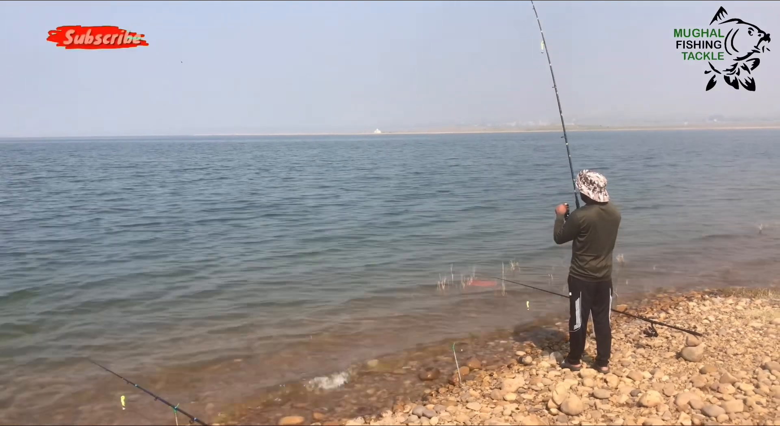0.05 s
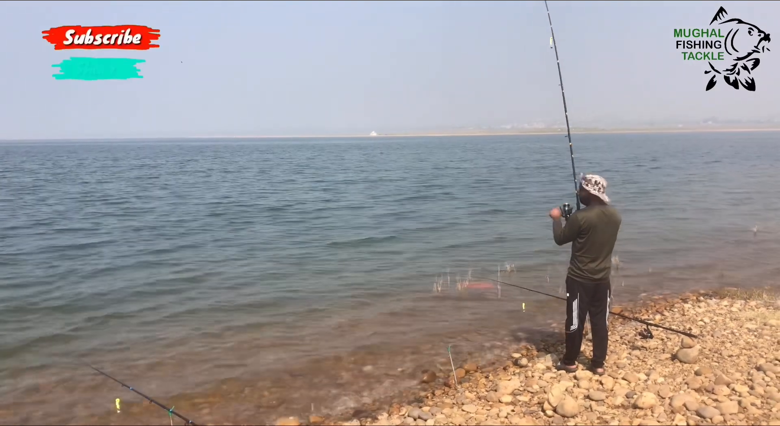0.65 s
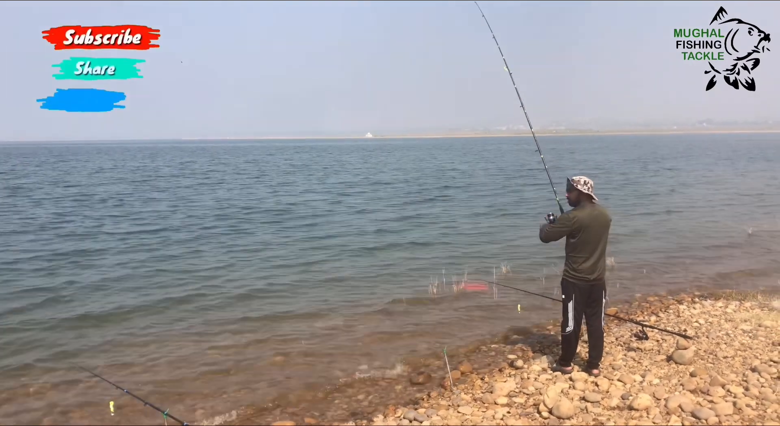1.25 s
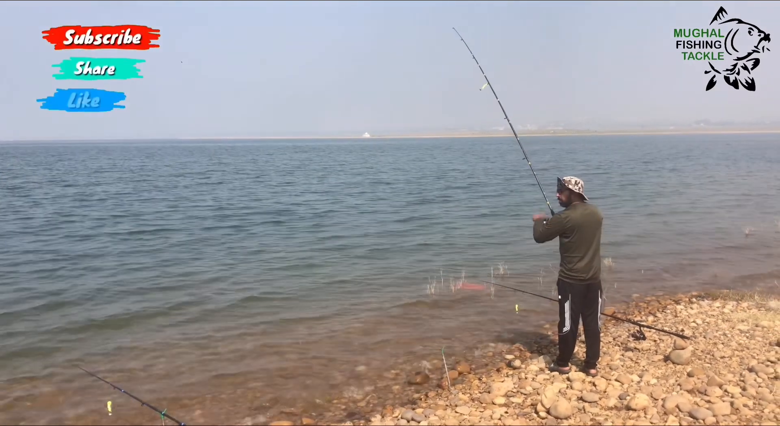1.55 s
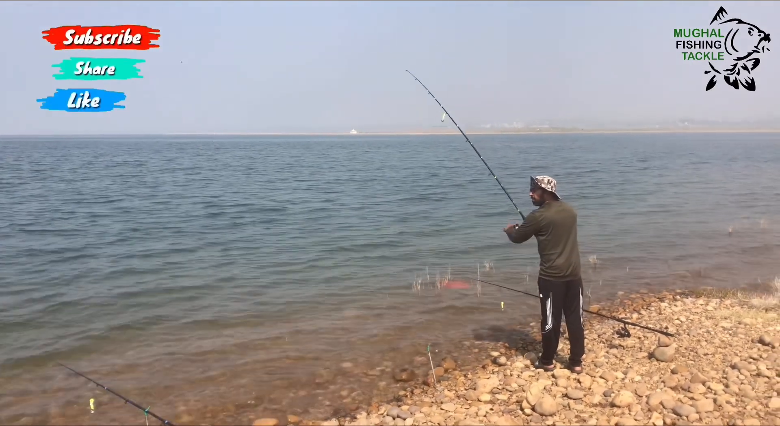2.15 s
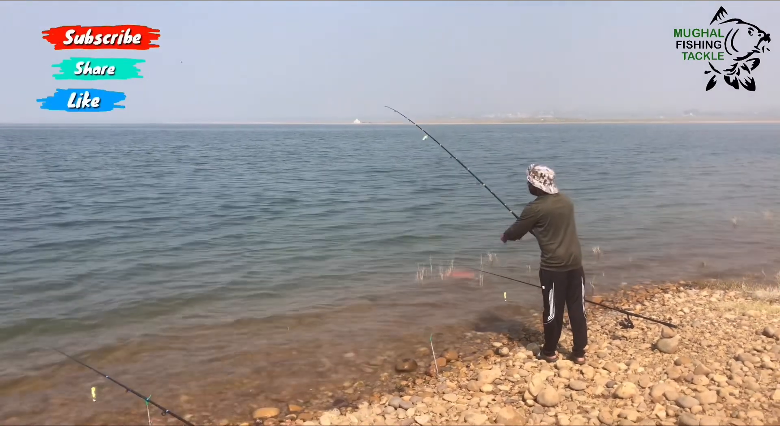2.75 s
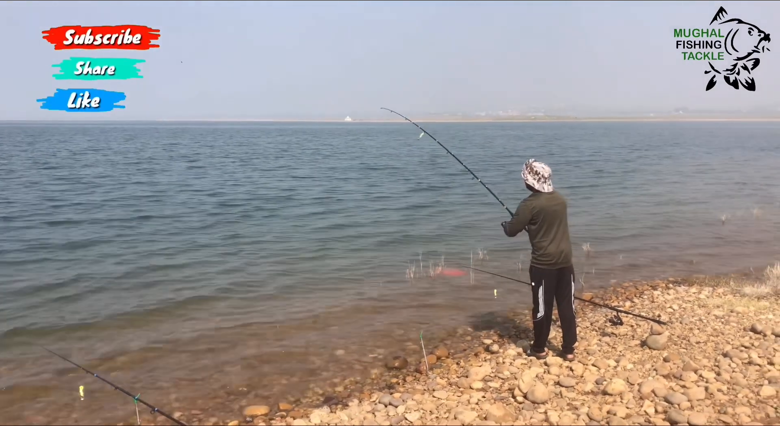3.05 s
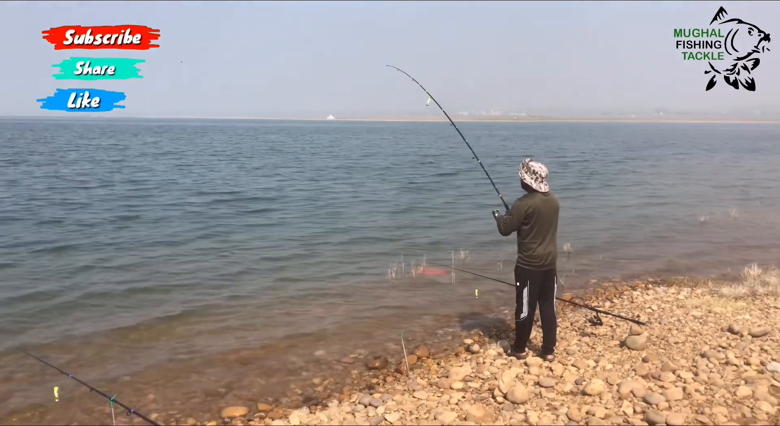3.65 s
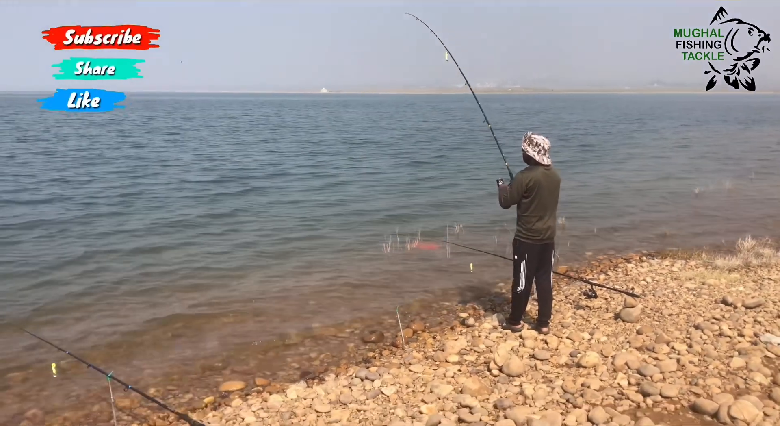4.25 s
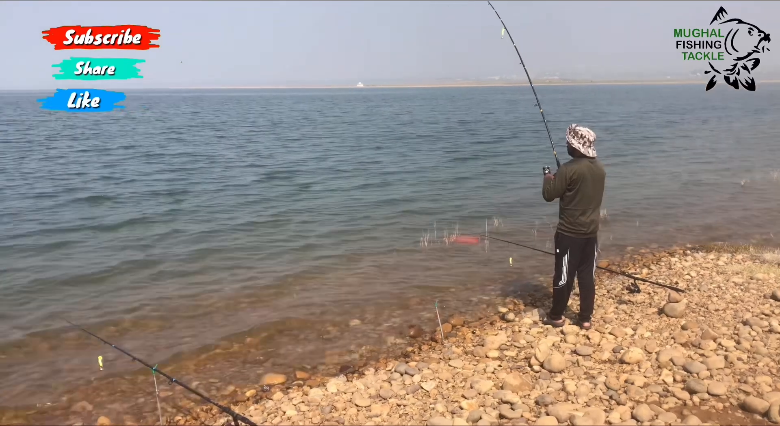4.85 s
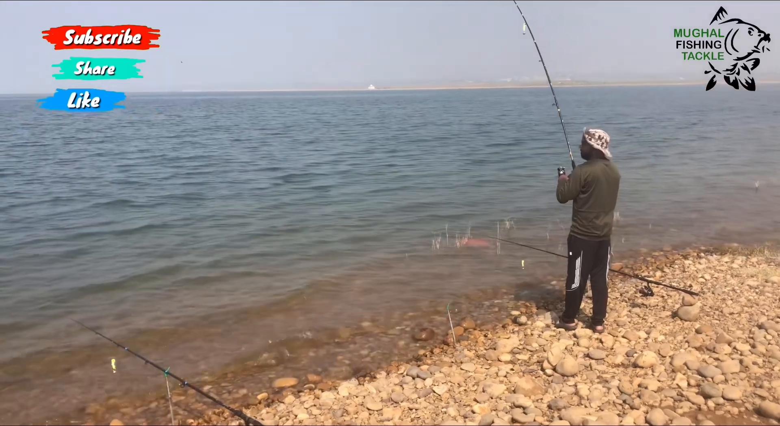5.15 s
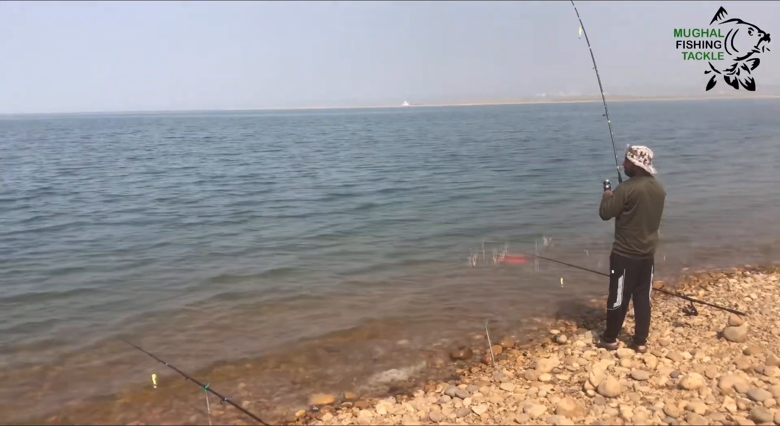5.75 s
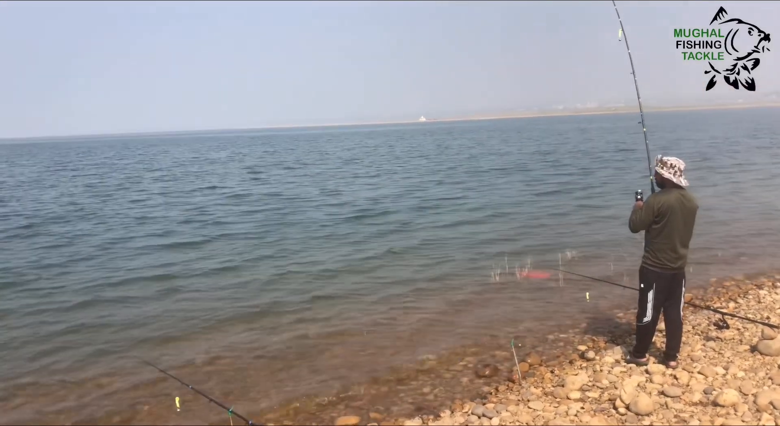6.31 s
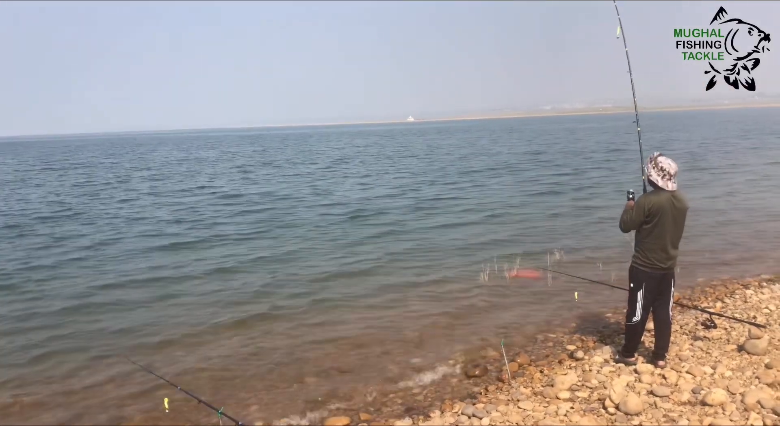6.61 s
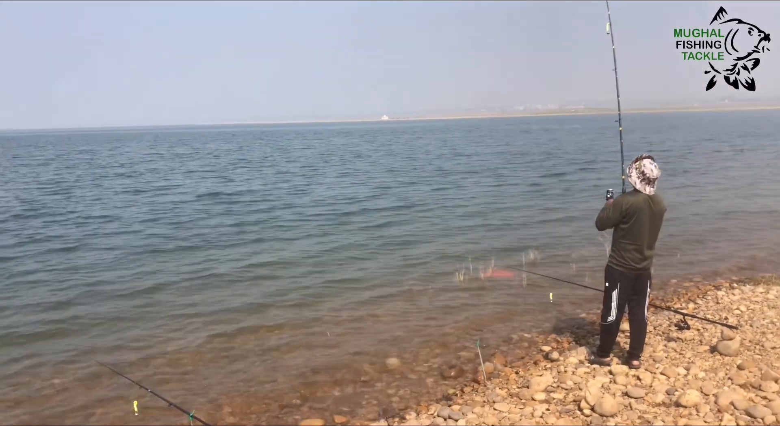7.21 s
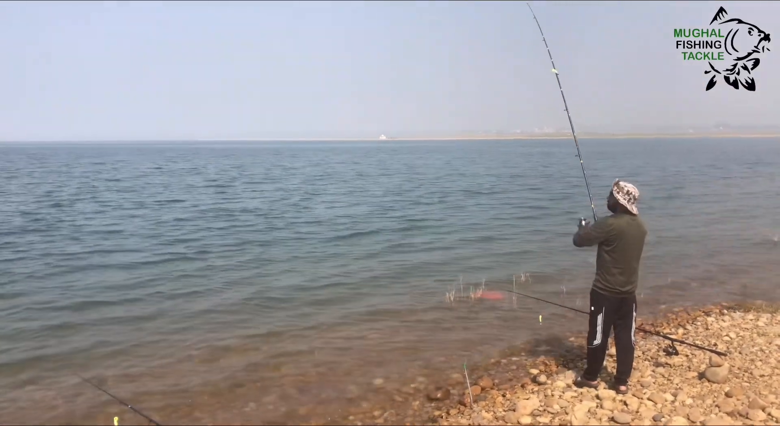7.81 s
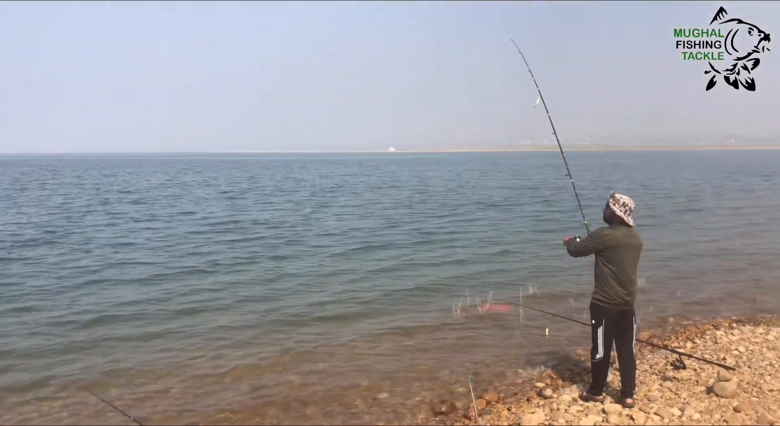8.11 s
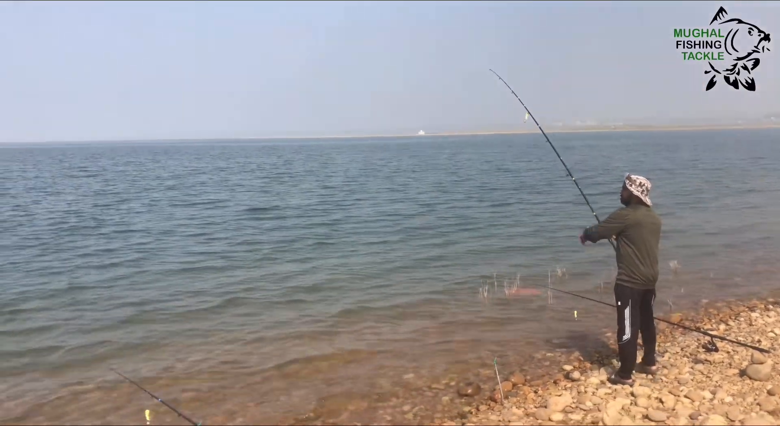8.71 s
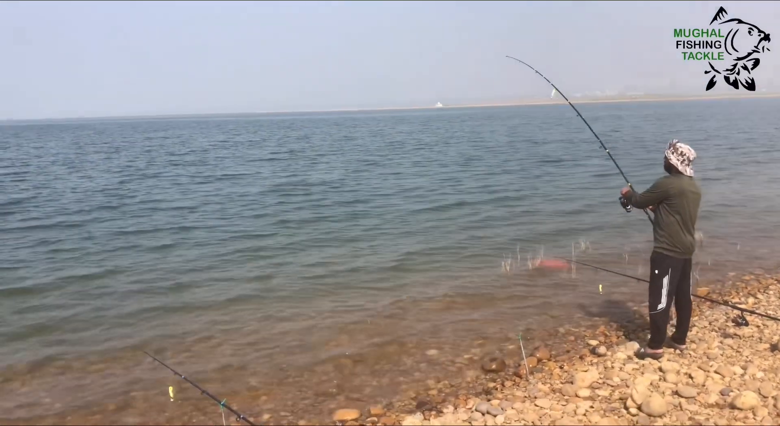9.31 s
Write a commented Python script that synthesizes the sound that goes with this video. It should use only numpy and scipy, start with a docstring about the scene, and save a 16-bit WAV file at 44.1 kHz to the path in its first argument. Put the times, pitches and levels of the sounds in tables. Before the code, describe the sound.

Uneven low wind rumbles and thumps over gently sloshing lake water, with high cricket chirps and a few light ticks.

```python
"""Small waves lap on a stony lake shore: bubbles ring as each one gulps, sloshes, splashes and fizzes.
Gusts rumble on the microphone and single eddies buffet it with brief swings of pressure.
Crickets chirp and trill in the dry stones by scraping their wings. A loose pellet jingles now and then
in a small bite bell on a fishing rod, and tackle and pebbles tick."""
import sys
import numpy as np
from scipy import signal
from scipy.fft import rfft, irfft, next_fast_len
from scipy.io import wavfile
from scipy.ndimage import uniform_filter1d

SR = 44100
rng = np.random.default_rng(int(sys.argv[2]) if len(sys.argv) > 2 else 0)


def file_out(sig):
    """Save sig as 16-bit WAV at sys.argv[1]."""
    # one column per channel
    cols = np.atleast_2d(sig).T
    # limit, then scale
    lim = np.clip(cols, -1, 1)
    pcm = np.round(lim * 32767).astype(np.int16)
    wavfile.write(sys.argv[1], SR, pcm)


N = 422037

# Waves running up the shore. Each row: break, start of ebb and rise time in seconds,
# then relative levels of gulp, slosh, splash and fizz in dB.
SHORE_WAVES = [(.06, .57, .12, -57.5, -41, -44.5, -52.5), (1.33, 1.62, .16, -56, -44, -46.5, -54.5),
               (2.27, 2.39, .23, -60, -49.5, -55, -61), (3.14, 3.23, .03, -67, -47, -52, -59),
               (4.24, 4.38, .18, -57.5, -46, -52, -66), (4.69, 4.93, .26, -61, -47.5, -51, -53.5),
               (5.41, 5.58, .19, -51, -43, -42.5, -50), (6.7, 6.84, .42, -48.5, -45, -44, -51),
               (7.52, 7.89, .33, -54.5, -47, -51, -55), (8.26, 8.98, .22, -57, -48.5, -51.5, -60.5)]
# Ripples between waves: relative levels of gulp, slosh, splash and fizz in dB.
RIPPLE_DB = (-64, -52.5, -54, -59.5)
DRAIN_S = .35   # water runs back between the stones


def waves():
    """Each wave gulps and splashes as it breaks, sloshes among the stones and fizzes as foam bursts."""
    # Spectra of the four parts. Each row: frequency in Hz, relative density in dB.
    gulp_spectrum = [(230, -6.5), (340, 0.5), (430, -0.5), (600, -1)]   # big air pockets under the breaking wave
    slosh_spectrum = [(120, -9), (260, -13.5), (490, -9), (630, -1.5), (850, -4), (1400, -4), (2000, -14.5),
                      (4000, -14.5)]
    splash_spectrum = [(700, -0.5), (1400, -2), (2000, -0.5), (2900, -0.5), (4000, -4.5), (5000, -10),
                       (6500, -9.5), (9000, -13)]
    fizz_spectrum = [(3500, 6), (5000, -0.5), (8000, 4.5), (9200, 2), (10400, -2.5), (11800, 3.5),
                     (14800, 4.5), (16000, 4)]
    gulp_db, slosh_db, splash_db, fizz_db = surge_levels_db(SHORE_WAVES, DRAIN_S, RIPPLE_DB)
    busy = from_db(.8 * (splash_db - np.mean(splash_db)))   # a breaking wave makes more bubbles
    pockets = grains(110 * busy, 247, 570, cycles=20.3, spread_db=2.0, count=12)
    gulp = coloured(pockets, gulp_spectrum)
    large = grains(800 * busy, 296.4, 2207, cycles=27.5, spread_db=3.0, count=44)
    slosh = water(large, slosh_spectrum, wash_db=5.5, churn_db=.5, churn_hz=7.7)
    small = grains(800 * busy, 1297, 7700, cycles=28, spread_db=2.5)
    splash = water(small, splash_spectrum, wash_db=4.0, churn_db=1.4, churn_hz=18)
    foam = grains(900 * busy, 4100, 17200, cycles=15, spread_db=4.0)
    fizz = water(foam, fizz_spectrum, wash_db=1.5, churn_db=1.73, churn_hz=34)
    return (from_db(gulp_db) * gulp + from_db(slosh_db - 0.1) * slosh
            + from_db(splash_db + 2.14) * splash + from_db(fizz_db + 2.5) * fizz)


def water(bubbles, spectrum, wash_db, churn_db, churn_hz):
    """Near bubbles over the smooth wash of the farther shore, both churning."""
    wash = from_db(wash_db) * rng.standard_normal(N)
    return coloured(bubbles + wash, spectrum) * from_db(churn_db * drift(churn_hz))


def plops(count=480, offset_db=-2, spread_db=3.0):
    """Single bubbles stand out from the wash; a running wave makes more and louder ones."""
    # Loudest single bubbles among the stones. Each row: start in seconds, level in dB, initial pitch in Hz.
    loud_bubbles = [(.43, -32.5, 910), (2.52, -37.5, 1100), (2.931, -37, 2100), (3.16, -35, 2560),
                    (3.203, -41, 850), (4.258, -38.5, 1075), (5.096, -33, 3160), (6.359, -42, 397),
                    (6.428, -35, 1510), (6.45, -39.5, 498)]
    out = np.zeros(N)
    for s, db, hz in loud_bubbles:
        add(out, s, from_db(db) * bubble(hz))
    slosh_db = surge_levels_db(SHORE_WAVES, DRAIN_S, RIPPLE_DB)[1]
    usual_db = .75 * slosh_db + .25 * np.mean(slosh_db) + offset_db
    stirred = np.cumsum(from_db(slosh_db))
    for when, pitch, rarity in rng.random((count, 3)):
        at = np.searchsorted(stirred, when * stirred[-1])
        db = usual_db[at] - spread_db * np.log(max(rarity, .04)) - 3 * pitch   # small ones are fainter
        add(out, at / SR, from_db(db) * bubble(700 * 5.2 ** pitch))
    return out


def bubble(hz, cycles=30, rise=0.21):
    """A bubble rings at birth; its pitch climbs as it nears the surface."""
    t = np.arange(int(0.96 * cycles / hz * SR)) / SR
    age = t * hz / cycles
    envelope = 2 * (1 - np.exp(-14 * age)) * np.exp(-4 * age)
    return envelope * np.sin(2 * np.pi * hz * np.cumsum(1 + rise * age) / SR)


def wind(fade_s=0.084):
    """Turbulence at the microphone: low rumble and a flutter of small eddies."""
    # Each row: start of hold, end of hold and rise time in seconds, relative rumble and flutter in dB.
    gusts = [(1.12, 1.72, .12, -39, -48.5), (2.0, 2.486, 0.08, -42, -56.5), (2.8, 3.0, 0.078, -40.5, -59),
             (3.247, 3.55, 0.082, -41.5, -71), (3.85, 4.48, 0.094, -46, -73), (6.1, 6.6, 0.76, -50, -45),
             (7.0, 7.3, .06, -46, -44.5), (7.699, 7.844, 0.074, -44, -43), (8.043, 8.2, 0.046, -47, -50)]
    # Between gusts: relative rumble and flutter in dB.
    breeze_db = (-53.5, -58)
    # Each row: frequency in Hz, relative density in dB.
    rumble_spectrum = [(22, -18), (35, -8), (50, -0.5), (74, 2.5), (100, -3.5), (140, -11.5), (220, -29.5),
                       (400, -45)]
    rumble_db, flutter_db = surge_levels_db(gusts, fade_s, breeze_db)
    rumble = coloured(rng.standard_normal(N), rumble_spectrum)
    rumble *= from_db(rumble_db + 5.0 + 2.0 * drift(rate_hz=11.0))
    eddies = grains(90, 58, 368, cycles=2.7, spread_db=2.5, count=8)
    flutter = coloured(eddies, [(60, -31), (120, -3.5), (220, -7.5), (450, -13.5)])
    return rumble + from_db(flutter_db) * flutter


def buffets(width_s=0.0089, width_slope=1.94, sag=.15, tail=1.22, tear_db=-21, wake_db=-11, wake_hz=58):
    """An eddy is a brief, ragged swing of pressure; sharp ones sink in pitch and leave a low wake."""
    # Strongest eddies. Each row: centre in seconds, relative level in dB, pitch at the centre in Hz.
    eddies = [(1.126, -29, 89), (1.177, -14.5, 114), (1.247, -18.5, 126.6), (1.521, -18.5, 81.7),
              (1.638, -19.5, 67.3), (1.992, -15, 139), (2.11, -21, 85.1), (2.94, -26, 74.2),
              (3.271, -14, 89.3), (3.534, -20, 85), (4.07, -20.5, 95.4), (4.456, -21.5, 84.6),
              (6.29, -27, 175.5), (6.982, -23.5, 185.7), (7.039, -18.5, 202), (7.179, -24.5, 144),
              (7.713, -22.5, 140.7), (7.76, -22.5, 99.4), (8.05, -21.5, 166.7), (8.242, -16, 119.2),
              (8.685, -10.5, 198)]
    out, edge = np.zeros(N), np.zeros(N)
    t = np.arange(-SR // 10, SR // 10) / SR
    for (s, db, hz), start_turn in zip(eddies, rng.random(len(eddies))):
        sharpness = hz / 100
        age = t * sharpness ** width_slope / width_s
        turns = np.cumsum(hz * np.exp(-2 * sag * sharpness ** 1.5 * np.tanh(age / 2))) / SR
        skewed_age = np.where(age < 0, age * tail, age)   # rises faster than it falls
        envelope = 1 / np.cosh(np.clip(skewed_age, -20, 20))
        swing = envelope * np.sin(2 * np.pi * (turns + start_turn))
        wake_gain = from_db(wake_db) * min(sharpness - .6, 1)
        wake = wake_gain * np.exp(-((t - .009) / 0.02) ** 2) * np.sin(2 * np.pi * wake_hz * t)
        add(out, s + t[0], from_db(db - 2.5) * (swing + wake))
        add(edge, s + t[0], from_db(db + tear_db) * sharpness * envelope ** 2)
    tearing = coloured(rng.standard_normal(N), [(150, 9.0), (240, -1.5), (340, -6.5), (600, -12.5)])
    return out + edge * tearing


def crickets(scatter_db=-11, decay_s=0.02):
    """Crickets chirp and trill; the stones scatter their song."""
    song = chirping_crickets() + trilling_cricket()
    echoes = rng.standard_normal(SR // 20) * np.exp(-np.arange(SR // 20) / SR / decay_s)
    scattered = signal.fftconvolve(song, echoes / np.linalg.norm(echoes))[:N]
    return song + from_db(scatter_db) * scattered


def chirping_crickets(period_s=.105, near_hz=7360, far_hz=(8020, 7380), far_db=(-51, -50)):
    """One near cricket chirps in bouts; two faint ones never rest."""
    # Each row: first and last chirp in seconds, relative level in dB.
    bouts = [(0.044, 0.256, -38.5), (0.742, 0.95, -38.5), (1.427, 1.743, -38.5), (2.163, 2.568, -38),
             (2.688, 2.806, -36.5), (3.295, 3.817, -38), (4.309, 4.636, -38.5), (5.159, 5.472, -38),
             (6.071, 6.387, -37.5), (6.875, 7.189, -37.5), (7.919, 8.135, -43.5), (8.648, 8.856, -41.5),
             (9.246, 9.523, -46.5)]
    out = np.zeros(N)
    for first_s, last_s, db in bouts:
        for s in np.linspace(first_s, last_s, round((last_s - first_s) / period_s) + 1):
            add(out, s, from_db(db) * chirp(near_hz))
    for hz, db in zip(far_hz, far_db):
        for s in np.arange(0, N / SR, period_s):
            add(out, s + rng.normal(0, .012), from_db(db + rng.normal(0, 0.96)) * chirp(hz, fall=0.043))
    return out


def trilling_cricket(strokes_per_s=116, stroke_s=.007):
    """Long runs of quick wing strokes, each run starting softly and gliding in pitch."""
    # Each row: start and end in seconds, first and last pitch in Hz, relative level in dB.
    trills = [(0.102, 0.414, 7100, 6600, -46.5), (1.681, 2.08, 6630, 6540, -43.5),
              (2.798, 3.0, 7670, 7500, -49), (3.651, 3.973, 6700, 6600, -43),
              (3.982, 4.46, 7270, 7150, -47.5), (5.659, 6.206, 7160, 7500, -46),
              (6.783, 7.003, 6900, 6650, -46.5), (7.249, 7.7, 7100, 7200, -47),
              (8.749, 9.149, 7000, 6500, -48.5)]
    out = np.zeros(N)
    for start_s, end_s, first_hz, last_hz, db in trills:
        for s in np.arange(start_s, end_s, 1 / strokes_per_s):
            hz = np.interp(s, [start_s, end_s], [first_hz, last_hz]) * rng.normal(1, 0.0095)
            fall = np.interp(hz, [6600, 7200], [.3, .11])   # lower strokes sweep further down
            onset = np.sqrt(min((s - start_s) / 0.071 + 0.25, 1))
            jitter_s = rng.normal(0, 0.00043)
            gain = onset * from_db(db + 1.0 + rng.normal(0, 0.76))
            add(out, s + jitter_s, gain * wing_stroke(hz, stroke_s, fall))
    return out


def chirp(hz, stroke_s=.0125, growth_db=0.95, fall=0.1, count=5):
    """A few wing strokes of growing strength."""
    levels_db = growth_db * np.arange(-count, 0) + rng.normal(0, 0.73, count)
    return np.concatenate([
        from_db(db) * wing_stroke(hz * rng.normal(1, 0.004), stroke_s * rng.normal(1, .06), fall)
        for db in levels_db])


def wing_stroke(hz, length_s, fall, rasp=0.0065):
    """The wing's file slows towards the end of a stroke, so the pitch droops."""
    progress = np.linspace(0, 1, max(int(length_s * SR), 16))
    scrape = uniform_filter1d(rng.standard_normal(len(progress)), size=16) * np.sqrt(16)
    pitch_hz = hz * (1 - fall * (progress ** 2 - 1 / 3) + rasp * scrape)
    return np.sin(np.pi * progress) * np.sin(2 * np.pi * np.cumsum(pitch_hz) / SR)


def bite_bell(rattle_db=-35.5, bounce_s=.011, fade_db=4, max_bounces=24, vary_db=2.0):
    """The loose pellet hits the shell, then rattles softly whatever the blow."""
    # Each row: time in seconds, relative level in dB, rattle length in seconds.
    strikes = [(1.301, -30, .025), (1.3545, -31, 0.028), (1.4394, -26.5, .025), (7.6171, -37, 0.017),
               (7.878, -26.5, 0.16), (8.4753, -33.5, .06), (9.2999, -35.5, .025), (9.396, -21, 0.029),
               (9.5023, -41, .01)]
    # Each row: frequency in Hz, gain in dB, T60 in seconds.
    shell_modes = [(3860, -6.5, 0.016), (4025, 2.5, 0.039), (4062, -7.5, 0.062), (4170, -6, 0.02),
                   (6320, -24, 0.037)]
    clicks, out = np.zeros(N), np.zeros(N)
    for s, db, rattle_s in strikes:
        add(clicks, s, from_db([db]))
        delays_s = np.cumsum(rng.uniform(0.22, 2.4, max_bounces)) * bounce_s
        for delay_s in delays_s[delays_s < rattle_s]:
            add(clicks, s + delay_s, from_db([rattle_db - fade_db * delay_s / rattle_s]))
    for k, (hz, db, t60_s) in enumerate(shell_modes):
        weights = from_db(db + vary_db * rng.standard_normal(N))   # each touch lands elsewhere
        out += (-1) ** k * ring(clicks * weights, hz, t60_s)
    return out


def ticks(t60_s=0.031, gain_db=-9):
    """Hard contacts of tackle and pebbles: bright cracks that die at once."""
    # Each row: time in seconds, relative level in dB.
    contacts = [(0.0714, -32), (1.299, -21), (1.6296, -28), (2.132, -31), (4.034, -28.5), (4.719, -30),
                (4.795, -25), (5.796, -24), (6.6645, -26), (7.8778, -17.5), (7.8814, -29), (8.761, -32)]
    # Each row: frequency in Hz, relative density in dB.
    crack_spectrum = [(1200, -29), (2500, 2.5), (4500, 3.5), (7000, 7.5), (9000, 5.5), (11000, -3),
                      (16000, 5.5)]
    envelope, t = np.zeros(N), np.arange(SR // 10) / SR
    for s, db in contacts:
        add(envelope, s, from_db(db + gain_db - 60 * t / t60_s))
    return envelope * coloured(rng.standard_normal(N), crack_spectrum)


def surge_levels_db(rows, release_s, rest_db):
    """Level of each part of a surge that rises, holds and dies away over a steady floor."""
    t = np.arange(0, N, 100) / SR
    power = from_db(rest_db)[:, None] ** 2
    for start_s, end_s, rise_s, *parts_db in rows:
        attack = np.exp(-(np.maximum(start_s - t, 0) / rise_s) ** 2)
        release = np.exp(-np.maximum(t - end_s, 0) / release_s)
        power = power + np.outer(from_db(parts_db), attack * release) ** 2
    return [np.interp(np.arange(N) / SR, t, db) for db in 10 * np.log10(power)]


def grains(per_s, low_hz, high_hz, cycles, spread_db, count=28):
    """Bubbles or eddies of uneven size, each ringing briefly at one of `count` pitches; rms 1."""
    at = np.flatnonzero(rng.random(N) < per_s / SR)
    sizes = from_db(spread_db * np.minimum(rng.exponential(1, len(at)), 4.5))
    sizes *= rng.choice([-1, 1], len(at))
    pitch_index = rng.integers(0, count, len(at))
    out = np.zeros(N)
    for k, hz in enumerate(np.geomspace(low_hz, high_hz, count)):
        clicks = np.zeros(N)
        clicks[at[pitch_index == k]] = sizes[pitch_index == k]
        out += hz * ring(clicks, hz, cycles / hz)
    return rms_one(out / np.sqrt(per_s))   # a denser crowd is smoother, not louder


def ring(clicks, hz, t60_s):
    """A unit click starts a decaying sine of height 1."""
    r, w = from_db(-60 / (t60_s * SR)), 2 * np.pi * hz / SR
    return signal.lfilter([0, np.sin(w)], [1, -2 * r * np.cos(w), r * r], clicks + 1e-18)


def coloured(x, spectrum):
    """Filter by (Hz, dB) points, falling 20 dB per octave past the ends; rms 1."""
    hz, db = np.transpose(spectrum)
    size = next_fast_len(len(x))
    octave = np.log2(np.maximum(np.arange(size // 2 + 1) * SR / size, 1))
    beyond = np.abs(octave - np.clip(octave, np.log2(hz[0]), np.log2(hz[-1])))
    gain = from_db(np.interp(octave, np.log2(hz), db) - 20 * beyond)
    return rms_one(irfft(rfft(x, size) * gain, size)[:len(x)])


def drift(rate_hz, hop=40, settle=2000):
    """Slow random wander; rms 1."""
    r = np.exp(-2 * np.pi * rate_hz * hop / SR)
    noise = rng.standard_normal(N // hop + settle + 2)
    slow = signal.lfilter([1], [1, -2 * r, r * r], noise)[settle:]
    return np.interp(np.arange(N) / hop, np.arange(len(slow)), rms_one(slow))


def add(out, start_s, sound):
    """Mix a short sound in at a time."""
    at = round(start_s * SR)
    first, last = max(at, 0), min(at + len(sound), N)
    if last > first:
        out[first:last] += sound[first - at:last - at]


def from_db(db):
    """Decibels to gain."""
    return 10 ** (np.asarray(db) / 20)


def rms_one(x):
    """Scale to unit power."""
    return x / np.sqrt(np.mean(x ** 2) + 1e-20)


def scene():
    """Open air, one microphone."""
    return (waves() + plops() + wind() + buffets() + crickets() + bite_bell() + ticks())[None]


def record(dry):
    """Steep low-pass on the top treble."""
    cutoff_hz = 15900
    return signal.sosfilt(signal.ellip(10, .2, 70, cutoff_hz, fs=SR, output="sos"), dry)


dry = scene()
out = record(dry)
file_out(out)
```